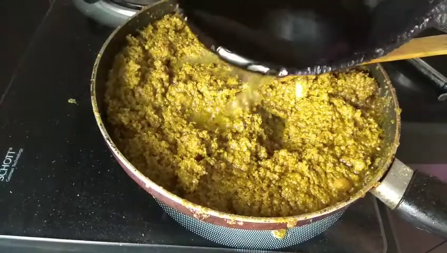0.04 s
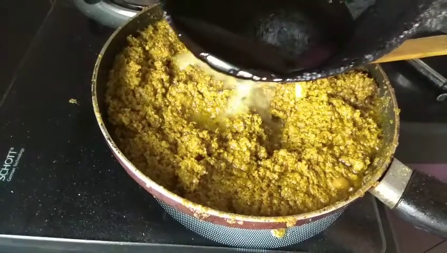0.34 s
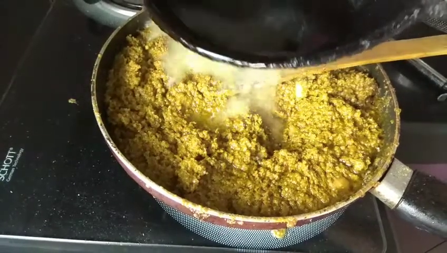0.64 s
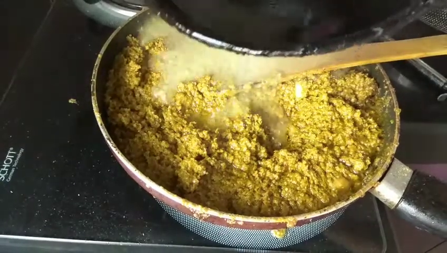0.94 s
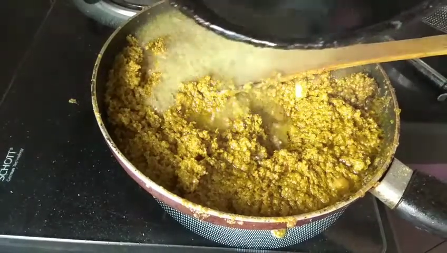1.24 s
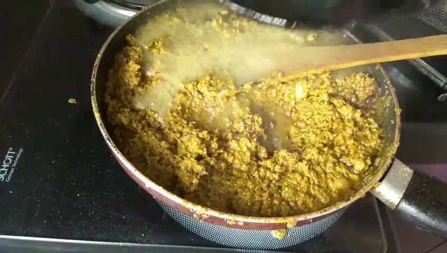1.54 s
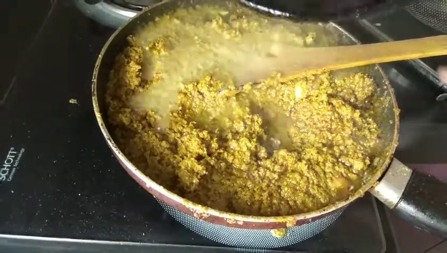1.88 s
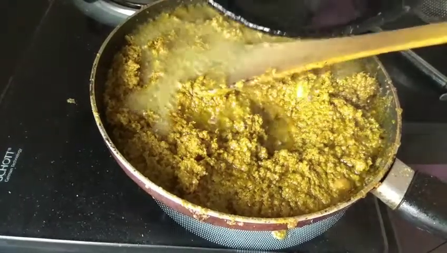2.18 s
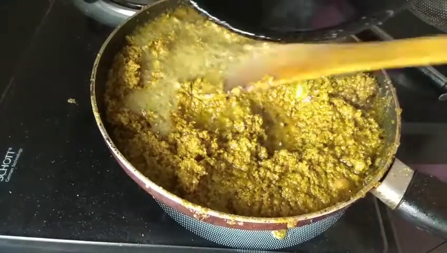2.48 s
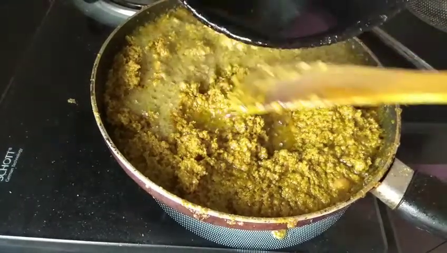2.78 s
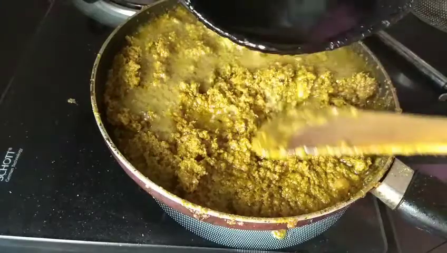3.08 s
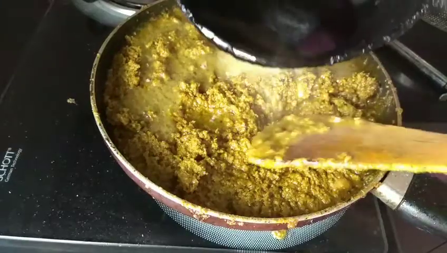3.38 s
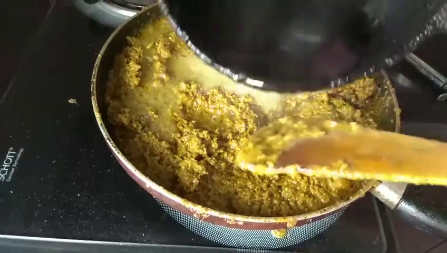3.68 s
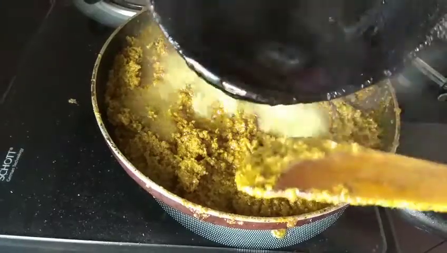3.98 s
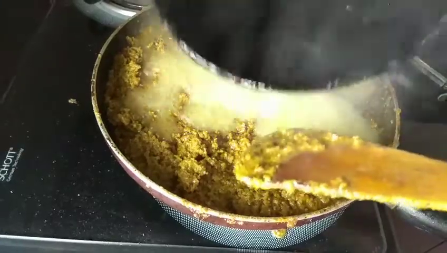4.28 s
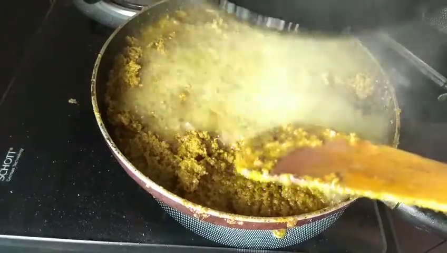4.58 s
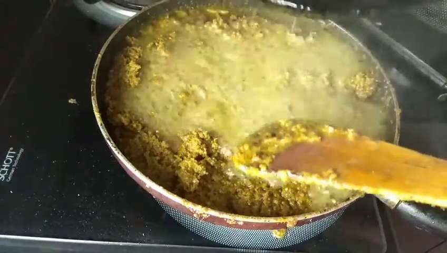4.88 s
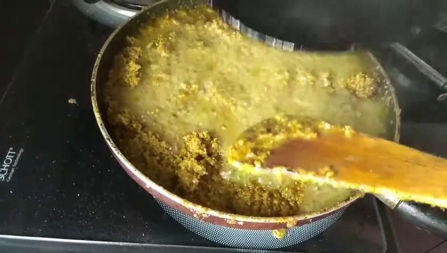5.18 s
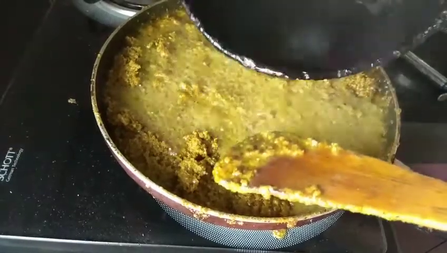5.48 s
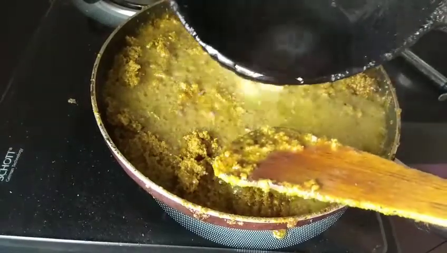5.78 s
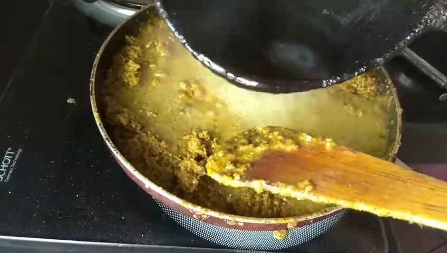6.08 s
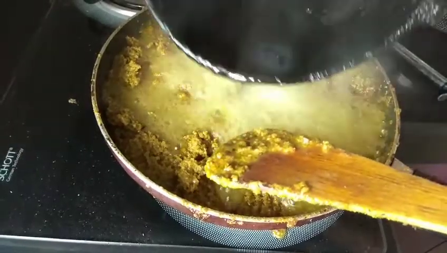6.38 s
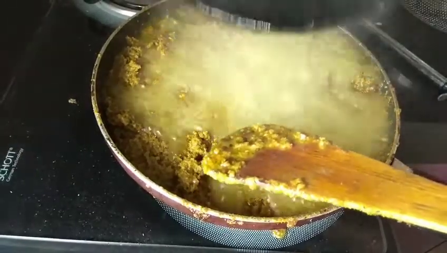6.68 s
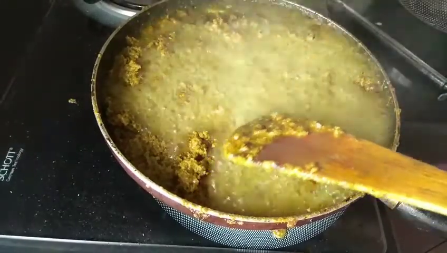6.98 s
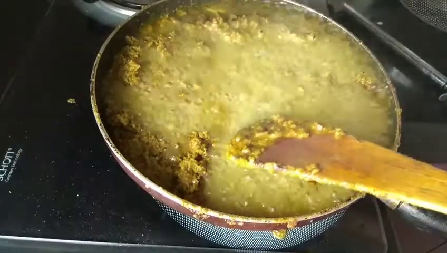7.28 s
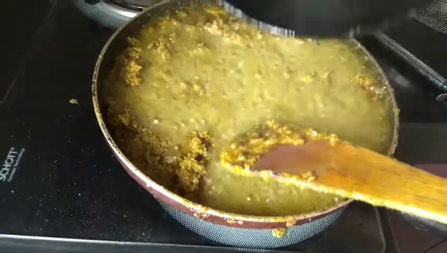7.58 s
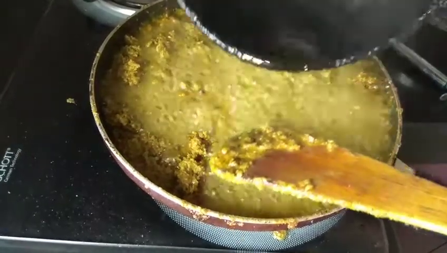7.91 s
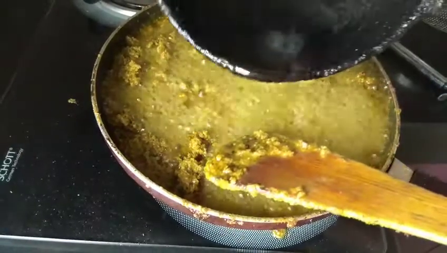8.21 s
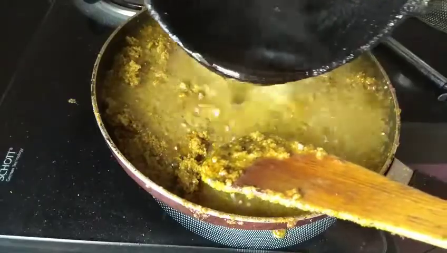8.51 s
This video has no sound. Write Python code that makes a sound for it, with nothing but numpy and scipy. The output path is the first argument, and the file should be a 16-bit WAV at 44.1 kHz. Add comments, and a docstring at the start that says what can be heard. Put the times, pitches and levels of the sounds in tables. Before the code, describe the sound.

Hot oil is poured onto paste in a pan four times, each pour flaring into a loud, bubbling sizzle before easing off.

```python
"""Spice paste simmers in a kitchen pan, close to a phone; a drip of hot oil fizzes and spits.
The first pour from a wok flashes the paste's water to steam: fine fizz starts at once over a low rush,
bigger bubbles follow and die first. A wooden spatula nudges the paste as the sizzle sags.
Near 3 and 6 s the wok hangs low and colours the sizzle as it pours again; deeper oil keeps the foam going.
Stray drops spit along the way, and a fourth pour flares just after 8 s."""
import sys
import numpy as np
from scipy import signal
from scipy.fft import rfft, irfft, next_fast_len
from scipy.io import wavfile
from scipy.ndimage import map_coordinates

SR = 44100
rng = np.random.default_rng(int(sys.argv[2]) if len(sys.argv) > 2 else 0)


def master_out(mix):
    """Clip the mix to full scale and print it as 16-bit PCM to the path in sys.argv[1]."""
    frames = np.transpose(np.atleast_2d(mix))
    ceiling = np.clip(frames, -1, 1)
    pcm = np.round(ceiling * 32767).astype(np.int16)
    wavfile.write(sys.argv[1], SR, pcm)


N = 381465
FRAME = 1024  # samples per short-time spectrum


def amp(db):
    """Decibels to gain."""
    return 10 ** (np.asarray(db) / 20)


def unit(x):
    """Scale to rms 1."""
    return x / np.sqrt(np.mean(x ** 2) + 1e-20)


def along(points, hz):
    """Read (Hz, value) points on a log axis."""
    freqs, values = np.transpose(points)
    return np.interp(np.log(hz + 1), np.log(freqs + 1), values)


def curve(points):
    """Join (seconds, value) points into one value per sample."""
    return np.interp(np.arange(N) / SR, *np.transpose(points))


def swell(centre, half_length):
    """A smooth hump of height 1, timed in seconds."""
    return np.exp(-((np.arange(N) / SR - centre) / half_length) ** 2)


def wobble(rate):
    """A smooth random curve with rate knots a second."""
    knots = rng.standard_normal(int(N * rate / SR) + 4)
    return map_coordinates(knots, [np.arange(N) * rate / SR])


def filtered(x, response):
    """Shape x with a gain that depends on frequency."""
    size = next_fast_len(N + SR // 2)
    return irfft(rfft(x, size) * response(np.fft.rfftfreq(size, 1 / SR)), size)[..., :N]


def band(hz, low_hz, high_hz, order=6):
    """Gain of a band-pass with steep skirts."""
    return 1 / np.sqrt((1 + (low_hz / (hz + 1)) ** (2 * order)) * (1 + (hz / high_hz) ** (2 * order)))


def patches(shape, width_hz, life_s):
    """A smooth random field over pitch and time."""
    bins, frames = np.indices(shape)
    hop = shape[0] - 1
    where = [bins * SR / (2 * hop) / width_hz, frames * hop / SR / life_s]
    return map_coordinates(rng.standard_normal((400, 400)), where, order=2, mode="wrap")


def patchy(x, depth_db, width_hz, life_s):
    """Narrow pitch ranges swell and fade at random; the result has rms 1."""
    spectra = signal.stft(x, nperseg=FRAME)[2]
    gain = amp(depth_db * np.tanh(patches(spectra.shape[1:], width_hz, life_s) + .5))
    return unit(signal.istft(spectra * gain, nperseg=FRAME)[1][:, :N])


def burst_sizes(count, spread_db):
    """Many small bursts and a few big ones, of either sign; all equally big at zero spread."""
    return amp(spread_db * np.minimum(rng.exponential(size=count), 5)) * rng.choice([-1, 1], count)


def clicks(rate, spread_db):
    """Bare clicks at random times, rate a second."""
    count = int(rate * N / SR)
    return np.bincount(rng.integers(N, size=count), burst_sizes(count, spread_db), N)


# The stereo image. Each row: frequency in Hz, likeness of left and right from 0 to 1.
LIKENESS = [(60, 0), (280, 0.18), (500, 0.07), (750, 0.42), (1000, 0.55), (1400, 0.65), (2000, 0.65),
            (2920, 0.2), (5000, 0.09), (8000, 0)]


def stereo(a, b):
    """Spread two unrelated sounds over the microphones: alike in the mids, unrelated in the treble."""
    angle = lambda hz: np.arccos(along(LIKENESS, hz)) / 2
    mid = filtered(a, lambda hz: np.cos(angle(hz)))
    side = filtered(b, lambda hz: np.sin(angle(hz)))
    return np.array([mid + side, mid - side])


def cooling(start, hold, sag, fade):
    """A pour's age in seconds and the dB its boil has lost: it sags, then fades as the heat is spent."""
    age = np.maximum(np.arange(N) / SR - start, 0)
    return age, sag * age + fade * np.maximum(age - hold, 0)


# Oil drips ahead of a pour and only fizzes. Each row: centre and half length in seconds, level in dB.
OIL_DRIPS = [(0.05, 0.11, -35), (3, 0.13, -29.5)]
# The four pours. Each row: start, fizz rise, foam rise and hold in seconds, fizz and foam levels in dB,
# sag and added fade after the hold in dB per second, depth of standing oil from 0 to 1.
OIL_POURS = [(0.151, 0.034, 0.096, 2.134, -17, 3.6, 2.5, 9, 0),
             (3.17, 0.016, 0.051, 1.63, -17, -0.67, 0.7, 10.5, 0.61),
             (5.807, 0.016, 0.036, 1.473, -19, -1.54, 1.0, 13, 0.83),
             (8.174, 0.4, 0.043, 1, -16.5, -0.9, 2.2, 2, .97)]
# Brief swells and dips in the loudness of foam and fizz.
# Each row: centre and half length in seconds, foam change in dB, fizz change in dB.
SIZZLE_SWELLS = [(0.33, .04, 3.5, 0.2), (0.46, 0.12, 3.5, 0), (0.54, .012, 3, 1.5), (1.28, 0.2, 0, -0.8),
                 (3.353, 0.15, 1.5, -2), (3.59, 0.11, 4.8, -.5), (3.93, 0.19, -3, -1.3),
                 (4.584, 0.37, 3.6, -0.95), (5.92, 0.08, 1.2, 0.5), (6.25, 0.3, 2.8, -1.5),
                 (6.58, 0.47, 5, 1.3), (8.26, 0.049, 1, 1.3), (8.65, 0.077, 8, 1.5)]


def boiling(simmer_db=-40.5):
    """How hard the paste boils, in dB: drips and pours add up over its own faint simmer."""
    power = amp(simmer_db) ** 2 + sum((amp(db) * swell(s, half)) ** 2 for s, half, db in OIL_DRIPS)
    for start, rise, _, hold, fizz_db, _, sag, fade, _ in OIL_POURS:
        age, lost_db = cooling(start, hold, sag, fade)
        power += (amp(fizz_db - lost_db) * (1 - np.exp(-age / rise))) ** 2
    return 10 * np.log10(power) + sum(db * swell(s, half) for s, half, _, db in SIZZLE_SWELLS)


# The tone of the fizz. Each row: frequency in Hz, relative level in dB.
FIZZ_TONE = [(3000, -46), (4500, -14.5), (6000, -6), (7500, -4), (9000, -1), (11300, 0), (13000, -2),
             (16000, -7.5)]
# The fizz brightens and dulls. Each row: time in seconds, lift of fine over coarse fizz in dB.
FIZZ_BRIGHTNESS = [(0, -4), (.5, 2.5), (1.5, -1.1), (2.7, -.3), (3.3, -.3), (3.85, 2), (4.25, 0.5),
                   (4.7, 0), (5.5, 1.5), (6, 1.5), (6.5, -0.5), (7.4, .5), (8.65, -0.5)]
# The fizzing patch shifts across the pan. Each row: time in seconds, left minus right in dB.
FIZZ_DRIFT = [(0, -5), (.1, -3), (.2, 2), (.45, -1), (1.1, 1.5), (1.6, -0.5), (3.1, 0.5), (3.85, 2.5),
              (4.7, 0.5), (5.6, -0.5), (5.85, 1.5), (6.3, -0.5), (7.3, 1.5), (7.7, 1.5), (8, 2), (8.65, 1)]


def fizz(boil_db, gain_db=4, flutter_db=.62, waver_db=.22, split_hz=9000):
    """Countless tiny steam bursts, each a bare click, merge into a hiss whose colour keeps shifting."""
    bursts = stereo(*[clicks(rate=36000, spread_db=0) for _ in range(2)])
    hiss = unit(filtered(bursts, lambda hz: amp(along(FIZZ_TONE, hz))))
    coarse = filtered(hiss, lambda hz: 1 / (1 + (hz / split_hz) ** 10))
    fine = hiss - coarse
    bright_db = curve(FIZZ_BRIGHTNESS)
    coarse *= amp(waver_db * wobble(12) - bright_db / 2)
    fine *= amp(waver_db * wobble(13) + bright_db / 2)
    lean_db = np.outer([.5, -.5], curve(FIZZ_DRIFT))
    return (coarse + fine) * amp(boil_db + gain_db + flutter_db * wobble(70) + lean_db)


# The tone of escaping steam. Each row: frequency in Hz, relative level in dB.
STEAM_TONE = [(20, 0.5), (90, 1), (250, 0.5), (500, 2), (900, -10), (2500, -17.5)]


def steam(boil_db, gain_db=-37, lumps_db=.5, hush_db=-73):
    """Escaping steam: a faint, uneven low rush that grows with the boil, over the kitchen's own hush."""
    noise = stereo(*rng.standard_normal((2, N)))
    rush = unit(filtered(noise, lambda hz: amp(along(STEAM_TONE, hz))))
    flow = amp(boil_db + gain_db + lumps_db * wobble(11))
    return patchy(rush, depth_db=5, width_hz=96, life_s=.096) * np.hypot(flow, amp(hush_db))


# The drops that stand out. Each row: start in seconds, relative level in dB.
SPITTING_DROPS = [(.0222, -25), (.0965, -21), (1.783, -16), (1.947, -15), (2.327, -17), (2.7835, -16),
                  (2.984, -14), (3.0014, -16), (3.037, -18), (3.0748, -16), (4.33, -9), (7.8202, -16),
                  (7.9038, -15)]


def spits(boil_db, t60_s=.0021, strays_per_s=8, stray_db=7):
    """Drops crack with a thin, high tick: a few at set times, and strays whose level follows the boil."""
    hits = np.zeros(N)
    strays = rng.integers(N, size=int(strays_per_s * N / SR))
    hits[strays] = amp(boil_db[strays] + stray_db)
    for start, db in SPITTING_DROPS:
        hits[round(start * SR)] = amp(db)
    t = np.arange(SR // 50) / SR
    cracks = signal.fftconvolve(hits, amp(-60 * t / t60_s))[:N] * rng.choice([-1, 1], N)
    return 2 * filtered(cracks, lambda hz: band(hz, 7000, 13000, order=4))


def bubbles(rate, low_hz, high_hz, cycles, spread_db, slope_db):
    """A cloud of bursting bubbles, rms 1: each rings briefly at a pitch set by its size."""
    count = int(rate * N / SR)
    when, smallness, life = rng.random((count, 3)).T
    pitch = low_hz + (high_hz - low_hz) * smallness
    strength = burst_sizes(count, spread_db) * amp(slope_db * smallness)
    step = np.arange(int(min(2 * cycles * SR / low_hz, 4.5e6 / count)))
    turns = pitch[:, None] * step / SR
    decay = np.exp(-2 * turns / (cycles * (.5 + life[:, None])))
    rings = strength[:, None] * np.sin(2 * np.pi * turns) * decay
    samples = (when * N).astype(int)[:, None] + step
    cloud = np.bincount(samples.ravel(), rings.ravel())
    return unit(filtered(cloud, lambda hz: band(hz, .86 * low_hz, .94 * high_hz)))


def froth(rate, band_hz, cycles, spread_db, slope_db, flutter_db):
    """Bubbles of one size class all over the pan, bursting in clumps."""
    clouds = [bubbles(rate, *band_hz, cycles, spread_db, slope_db) for _ in range(2)]
    return unit(stereo(*clouds)) * amp(flutter_db * wobble(45))


# Bubble classes, smallest first. Each row: relative level in dB, multiple of the foam rise, added share
# of the fizz rise, dB lost per dB of cooling with no standing oil, share of a swell,
# lag behind a swell in seconds, simmer level in dB.
BUBBLE_CLASSES = [(-28, 0.78, 0.47, 1.26, 0.45, 0.016, -60), (-30, 1.4, 0.17, 2.5, 0.35, 0.029, -66),
                  (-33.5, 1.96, 0, 3.5, 0.51, 0.005, -74), (-42.5, 3, 0.29, 4, 0.75, 0.015, -71.5),
                  (-55.5, 3.2, 0.37, 8, 1.66, 0.065, -75)]


def foam_gains(oil_hold=.77):
    """Gain of each bubble class: bigger ones build later and die faster, less so in deep oil."""
    gains = []
    for class_db, slowness, follows, steepness, share, lag, simmer_db in BUBBLE_CLASSES:
        swell_db = sum(share * db * swell(s + lag, half) for s, half, db, _ in SIZZLE_SWELLS)
        power = amp(simmer_db) ** 2
        for start, fizz_rise, foam_rise, hold, _, foam_db, sag, fade, depth in OIL_POURS:
            age, lost_db = cooling(start, hold, sag, fade)
            level_db = class_db + foam_db + swell_db - steepness * (1 - oil_hold * depth) * lost_db
            rise = slowness * foam_rise + follows * fizz_rise
            power = power + (amp(level_db) * (1 - np.exp(-age / rise))) ** 2
        gains.append(np.sqrt(power))
    return gains


def foam():
    """Steam foams up through the oil: the bigger the bubbles, the fewer and lower they are."""
    layers = [
        froth(rate=7000, band_hz=(3435, 6500), cycles=3.8, spread_db=1, slope_db=3.5, flutter_db=1.5),
        froth(rate=4000, band_hz=(2110, 3690), cycles=6, spread_db=1, slope_db=6, flutter_db=.6),
        froth(rate=3400, band_hz=(1194, 2218), cycles=8.9, spread_db=.4, slope_db=8.5, flutter_db=.3),
        froth(rate=1700, band_hz=(868, 1280), cycles=3.2, spread_db=.5, slope_db=6.5, flutter_db=.9),
        froth(rate=1100, band_hz=(382, 847), cycles=31, spread_db=2, slope_db=12.5, flutter_db=1.9)]
    return sum(gain * layer for gain, layer in zip(foam_gains(), layers))


def shimmer(x, depth_db=4, width_hz=124.96, life_s=.08, roam=1.32):
    """Narrow bands of the sizzle swell, fade and shift between centre and sides at random."""
    mids = filtered(x, lambda hz: band(hz, 1750, 7600, order=8))  # the finest fizz stays smooth
    flickering = mids.std() * patchy(mids, depth_db, width_hz, life_s)
    left, right = signal.stft(flickering, nperseg=FRAME)[2]
    centred = np.tanh(roam * patches(left.shape, width_hz, life_s))
    mid = (left + right) / 2 * np.sqrt(1 + centred)
    side = (left - right) / 2 * np.sqrt(1 - centred)
    return x - mids + signal.istft(np.array([mid + side, mid - side]), nperseg=FRAME)[1][:, :N]


# The wok dips and lifts over the pan. Each row: time in seconds, cover from 0 (away) to 1 (close).
WOK_COVER = [(0, 0), (.5, 0.23), (1.5, 0.13), (2.5, 0.1), (3.2, 1), (3.7, 1), (4.25, 0.25), (4.7, 0),
             (5.1, 0.5), (5.7, 1), (6.35, 1), (6.8, 0.16), (7.3, 0), (7.8, 0.44), (8.3, 0.48), (8.65, 0.7)]
# The ring of the gap between wok and pan. Each row: pitch in Hz, width in Hz, strength in dB,
# share by which the pitch moves as the wok lifts away.
GAP_MODES = [(468, 100, -8, 0), (673, 60, 1, -0.0041), (1085, 58, 3.5, -0.032), (1254, 82, 4.3, -0.038),
             (1478, 75, 4.5, 0.019), (1893, 160, 3.5, .02), (2520, 140, -4, 0), (2830, 150, -5.5, 0.015),
             (3300, 130, -13, 0), (4174, 170, 3.5, 0.015)]


def under_wok(x, open_ring=.24):
    """The gap rings more as the wok comes down, and its pitches glide; the open pan rings a little."""
    hz, t, spectra = signal.stft(x, SR, nperseg=FRAME)
    cover = np.interp(t, *np.transpose(WOK_COVER))
    ring = 0
    for pitch, width, db, glide in GAP_MODES:
        centre = pitch * (1 + glide * (1 - cover))
        ring += amp(db) ** 2 / (1 + ((hz[:, None] - centre) / width) ** 2) ** 2
    gain = np.sqrt(1 + (open_ring + cover) * ring)
    return signal.istft(spectra * gain, SR, nperseg=FRAME)[1][:, :N]


# Weak slaps off pan rim, wok and hob. Each row: delay in seconds, level in dB.
EARLY_ECHOES = [(.0013, -21), (.0022, -19), (.0041, -20)]


def reflections(x, wander_s=.00008, dull_hz=7500):
    """Nearby surfaces answer within milliseconds, along paths that wander slightly."""
    n = np.arange(N)
    dull = filtered(x, lambda hz: 1 / (1 + (hz / dull_hz) ** 6))
    out = x.copy()
    for delay, db in EARLY_ECHOES:
        lag = (delay + wander_s * wobble(2.6)) * SR
        out += amp(db) * np.array([np.interp(n - lag, n, channel, left=0) for channel in dull])
    return out


def kitchen(x, tail_db=-11, t60_s=.12):
    """Cupboards and tiles scatter the sizzle into a short, dull, diffuse tail."""
    t = np.arange(int(t60_s * SR)) / SR
    tail = rng.standard_normal((2, len(t))) * amp(-60 * t / t60_s)
    tail /= np.linalg.norm(tail[0])
    dull = filtered(x, lambda hz: band(hz, 100, 6500))
    return x + amp(tail_db) * signal.fftconvolve(dull, tail, axes=1)[:, :N]


# The pan's damped ring. Each row: pitch in Hz, half width in Hz, relative level in dB.
PAN_MODES = [(1060, 32, 2), (1290, 41, -5), (1550, 55, 3), (1950, 82, 1), (2510, 76, 5), (3500, 70, 8)]
# Spatula moves. Each row: centre in seconds, level in dB, pitch in Hz, half length in seconds.
SPATULA_NUDGES = [(1.0, -57, 170, .04), (2.22, -53, 1000, .045), (2.47, -48, 1600, .07),
                  (2.72, -59, 1350, .16), (2.95, -53, 2700, .05), (3.02, -63, 1080, .05)]


def spatula():
    """Wood pushed through paste drags grit over the pan, in soft, dull swells coloured by its modes."""
    out = np.zeros((2, N))
    body = lambda hz: .14 + sum(amp(db) / (1 + ((hz - mode) / width) ** 2)
                                for mode, width, db in PAN_MODES)
    for centre, db, pitch, half_length in SPATULA_NUDGES:
        grit = clicks(rate=900, spread_db=3)
        rub = unit(filtered(grit, lambda hz: body(hz) * band(hz, .78 * pitch, 1.3 * pitch, order=4)))
        out += rub * amp(db) * swell(centre, half_length)
    return out


# The balance of the whole mix. Each row: frequency in Hz, left minus right in dB.
STEREO_TILT = [(60, 1), (200, 3.5), (370, 0), (700, 2.5), (1230, -1.5), (2250, 0), (4200, -0.5),
               (8800, -0.9), (10000, 0), (11500, 7), (13000, 3)]


def scene():
    """Fizz and foam sputter together, joined by spits, steam and spatula; the top treble leans left."""
    boil_db = boiling()
    sputter = amp(.31 * wobble(22))
    sizzle = sputter * under_wok(shimmer(fizz(boil_db) + amp(-2) * foam()))
    mix = kitchen(reflections(sizzle)) + spits(boil_db) + steam(boil_db) + spatula()
    return filtered(mix, lambda hz: amp(np.outer([.5, -.5], along(STEREO_TILT, hz))))


def record(dry):
    """The phone rounds off the tallest peaks and keeps nothing above its band limit."""
    ceiling, top_hz = .9, 13200
    rounded = dry / (1 + np.abs(dry / ceiling) ** 12) ** (1 / 12)
    return filtered(rounded, lambda hz: 1 / (1 + (hz / top_hz) ** 300))


dry = scene()
out = record(dry)
master_out(out)
```